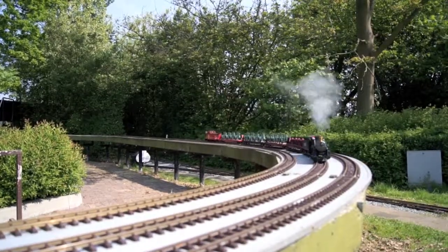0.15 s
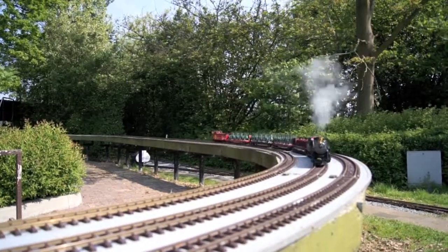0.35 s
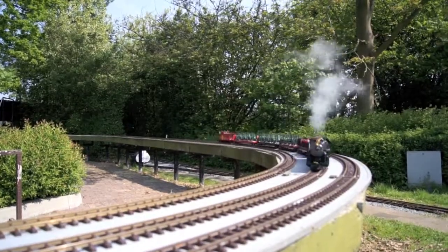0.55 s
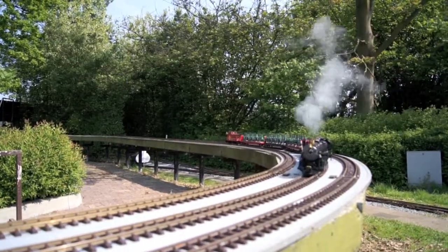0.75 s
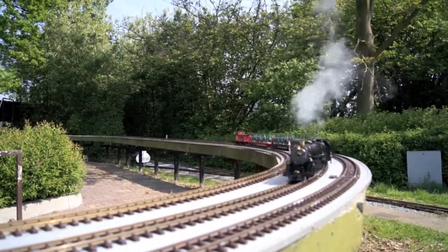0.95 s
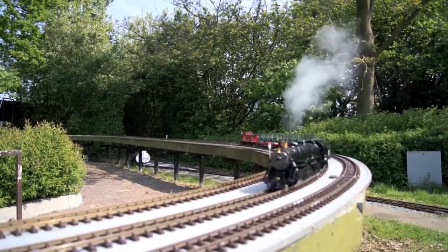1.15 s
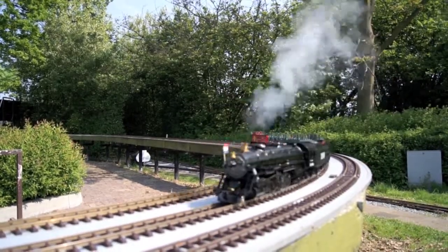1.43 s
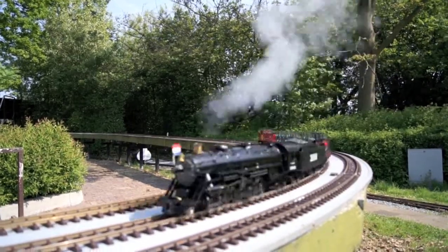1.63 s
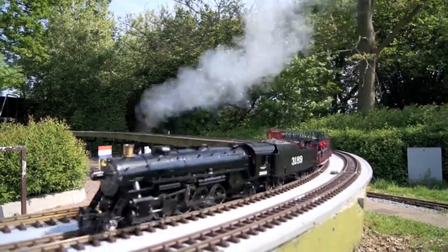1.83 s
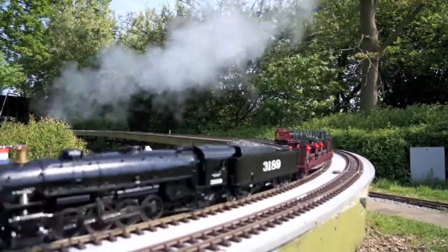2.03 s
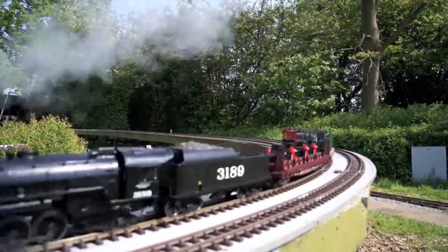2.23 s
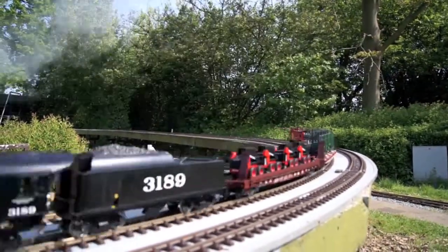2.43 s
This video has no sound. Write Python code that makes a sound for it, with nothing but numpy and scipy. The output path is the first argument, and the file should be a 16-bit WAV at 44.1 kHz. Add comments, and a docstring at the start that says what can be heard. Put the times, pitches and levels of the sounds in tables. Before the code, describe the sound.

A miniature steam locomotive chuffs rapidly and hisses as it passes from right to left.

```python
"""A small live-steam locomotive rounds a garden railway curve, passing close from right to left.
Its exhaust beats four times per wheel turn, unevenly: each puff roars in the chimney, rings in the
blast pipe and hisses, spitting a little water. The track bed reflects the steam and the hedges throw back
a soft wash. Heard from the trackside on a closely spaced microphone pair, over faint garden air."""
import sys
import numpy as np
from scipy import signal
from scipy.fft import rfft, irfft
from scipy.io import wavfile

SR = 44100
rng = np.random.default_rng(int(sys.argv[2]) if len(sys.argv) > 2 else 0)


def persist_wave(psi):
    """Save psi, clipped to +-1, as 16-bit WAV."""
    counts = np.round(np.clip(psi, -1, 1) * 32767).astype(np.int16)
    wavfile.write(sys.argv[1], SR, np.atleast_2d(counts).T)


N = 114660
TIME = np.arange(N) / SR
FRAME, HOP = 1024, 512

# engine's bearing from the microphones: t/s, bearing (-1 right, 0 ahead, 1 and beyond left)
BEARING = [(0, -.93), (.4, -.98), (.9, -.88), (1.4, -.62), (1.65, -.3), (1.85, .0), (2.05, .5), (2.2, .75),
           (2.35, 1.12), (2.6, 1.45)]


def from_db(db):
    """Decibels to gain."""
    return 10 ** (np.asarray(db) / 20)


def rms_one(x):
    """Scale to unit power."""
    return x / np.sqrt(np.mean(x ** 2) + 1e-20)


def in_time(rows, s, column=1):
    """One column of a curve at the given times."""
    rows = np.array(rows)
    return np.interp(s, rows[:, 0], rows[:, column])


def at_hz(rows, hz, column=1):
    """One column of a spectrum, joined on a log-frequency axis."""
    rows = np.array(rows)
    return np.interp(np.log(hz + 1), np.log(rows[:, 0]), rows[:, column])


def drift(rate_hz):
    """Random wander with a spread of 1, mostly slower than rate_hz."""
    hz = np.arange(N // 2 + 1) * SR / N
    return rms_one(irfft(rfft(rng.standard_normal(N)) / (1 + (hz / rate_hz) ** 2), N))


def band(spectrum, level_db, hz):
    """Gain of one group of resonances over frequency and time."""
    gain = from_db(at_hz(spectrum, hz)) * (hz >= spectrum[0][0]) * (hz < spectrum[-1][0])
    return rms_one(gain) * from_db(level_db)


def exhaust_flow(attack_s=.003, jitter_s=.0002, spread_db=.2):
    """Each beat of steam opens fast, holds and dies away; they overlap except at the end of the turn."""
    # start of each turn of the driving wheels: t/s
    turns = [-.113, .031, .177, .323, .468, .612, .759, .905, 1.053, 1.202, 1.352, 1.504, 1.657, 1.809,
             1.958, 2.107, 2.257, 2.406, 2.556, 2.706]
    # beats of one turn: start/turns, level/dB, hold/s, release time constant/s
    beats = [(-.012, .3, .019, .017), (.25, .6, .017, .023), (.48, -.4, .017, .024),
             (.685, -.1, .018, .012)]
    power = np.zeros(N)
    for start, end in zip(turns, turns[1:]):
        for share, db, hold, release in beats:
            late, strong = rng.standard_normal(2)
            age = TIME - start - share * (end - start) - jitter_s * late
            shape = np.clip(age / attack_s, 0, 1) * np.exp(-np.maximum(age - hold, 0) / release)
            power += (from_db(db + spread_db * strong) * shape) ** 2
    return rms_one(np.sqrt(power))


def spitting(flow, decay_s=.002, sputter_per_s=60, sputter_db=-13.):
    """Power of brief bursts of wet steam: a few strong spits, and a sputter during the beats."""
    # drops of water spat from the chimney: t/s, relative level/dB
    spits = [(.032, 0.), (.406, -1.), (.482, 1.), (.693, 1.), (.800, -1.), (1.100, -1.), (1.248, -1.),
             (1.505, 0.), (1.549, -2.), (2.001, -2.), (2.008, -2.), (2.560, -1.)]
    sputters = rng.random(N) < sputter_per_s * flow ** 2 / SR
    kicks = sputters * from_db(sputter_db) ** 2 * rng.exponential(1, N)
    for s, db in spits:
        kicks[int(s * SR)] += from_db(db) ** 2
    return signal.lfilter([2], [1, -np.exp(-1 / (decay_s * SR))], kicks)


def turbulence(beats, leak_db, flutter_db, flutter_hz, wash_s=.025):
    """Short-time spectra of the jet (beats over a steady leak) and its lagging wash on either side."""
    jet = rms_one(np.sqrt(beats + from_db(leak_db) ** 2) * from_db(flutter_db * drift(flutter_hz)))
    pole = np.exp(-1 / (wash_s * SR))
    lagged_power, _ = signal.lfilter([1 - pole], [1, -pole], jet ** 2, zi=[pole * jet[0] ** 2])
    wash = np.sqrt((jet ** 2 + lagged_power) / 2)
    noise = rng.standard_normal((3, N)) * [jet, wash, wash]
    return signal.stft(noise, SR, nperseg=FRAME, noverlap=FRAME - HOP)


def chimney(level_db, hz, s, ring_hz=845, half_width_hz=50, low_cut_hz=370):
    """Gain of the hollow chimney, whose main resonance stands out while the engine is closest."""
    # chimney resonances: f/Hz, level/dB
    resonances = [(200.0, -28.2), (330.0, -19.2), (420.0, -15.4), (490.0, -9.2), (590.0, -15.5),
                  (700.0, -7.3), (830.0, 0.0), (980.0, -4.9), (1200.0, -8.0), (1380.0, -18.5),
                  (1600.0, -11.5), (1800.0, -9.0), (2120.0, -7.3), (2350.0, -16.1)]
    # lift of the main resonance: t/s, level/dB
    lift = [(0, .5), (1.85, 0.), (2.1, 3.5), (2.35, 0.), (2.6, -1.)]
    ring = from_db(in_time(lift, s) / (1 + ((hz - ring_hz) / half_width_hz) ** 2))
    return band(resonances, level_db, hz) * ring * np.minimum(hz / low_cut_hz, 1) ** 2


def rumble(hz, s):
    """Gain of a low rumble that fades as the train comes round."""
    # rumble spectrum: f/Hz, level/dB
    spectrum = [(100, -22.), (150, -12.), (200, -5.), (300, 0.), (380, -8.)]
    # its fade: t/s, level/dB
    fade = [(0, -56.5), (1.3, -58.5), (2., -66.), (2.6, -70.)]
    return band(spectrum, in_time(fade, s), hz)


def blast_pipe(level_db, hz, s, shoulder_hz=3400, db_per_bearing=1.1):
    """Gain of the ringing blast pipe, which fills out below its main ring as the engine turns side-on."""
    # blast pipe resonances: f/Hz, level/dB
    resonances = [(2350, -32.), (2440, -22.), (2580, -10.8), (2870, -7.8), (3150, -10.6), (3460, -12.8),
                  (3620, -3.5), (3800, 0.), (4020, -6.5), (4220, -9.), (4350, -13.)]
    shoulder = from_db(db_per_bearing * in_time(BEARING, s) * (hz < shoulder_hz))
    return band(resonances, level_db, hz) * shoulder


def steam_hiss(lower_db, upper_db, sizzle_db, hz, s, top_from_hz=9500, top_full_hz=13000):
    """Gain of escaping steam: two bands of hiss and a sizzle whose top opens as the boiler goes by."""
    # the three bands, low to high: f/Hz, level/dB
    lower = [(4350, -3.), (4680, 0.), (5100, -4.6), (5400, -7.)]
    upper = [(5400.0, -6.2), (5850.0, -2.6), (6200.0, 0.0), (6500.0, -5.7), (6830.0, -15.0),
             (7050.0, -14.2), (7400.0, -17.8), (7800.0, -23.9)]
    sizzle = [(7800.0, -19.6), (8500.0, -8.7), (9100.0, 0.0), (10000.0, -6.3), (10800.0, -12.6),
              (12000.0, -21.3), (13200.0, -29.5), (15000.0, -37.4)]
    # lift of the sizzle's top: t/s, level/dB
    lift = [(0, -2.), (.5, -2.), (1.5, 1.5), (1.95, -1.), (2.2, 2.), (2.28, 15.), (2.6, 12.)]
    top = from_db(in_time(lift, s) * np.clip((hz - top_from_hz) / (top_full_hz - top_from_hz), 0, 1))
    return band(lower, lower_db, hz) + band(upper, upper_db, hz) + top * band(sizzle, sizzle_db, hz)


def track_bounce(hz, s, far_gain=.14):
    """Two reflections comb the steam with ridges that slide down as the engine nears."""
    # reflections: t/s, delay off the track bed/ms, delay of a longer path/ms, gain off the bed
    paths = [(0, .118, .8, .22), (.5, .15, .83, .2), (.9, .185, .86, .13), (1.25, .244, .888, .15),
             (1.6, .267, .92, .24), (1.9, .29, .955, .22), (2.2, .347, 1.0, .2), (2.4, .385, 1.03, .24),
             (2.6, .42, 1.06, .15)]
    bed, far = [np.exp(-2j * np.pi * hz * in_time(paths, s, column=k) / 1000) for k in (1, 2)]
    bed_gain = in_time(paths, s, column=3)
    return (1 + bed_gain * bed + far_gain * far) / np.sqrt(1 + bed_gain ** 2 + far_gain ** 2)


def microphones(frames, hz, s, near_wash_db=-2.5):
    """Trackside pair: bearing sets the balance and the jet's lag; each side gets its own wash."""
    # left minus right: f/Hz, level/dB for a source on the right, level/dB for one on the left
    balance = [(300.0, -0.1, -0.8), (520.0, -2.4, -1.1), (850.0, 1.5, 2.0), (1300.0, -1.1, 1.9),
               (1650.0, 6.8, 4.6), (2200.0, -0.4, 1.9), (2850.0, 3.8, 4.3), (3400.0, 0.4, 3.3),
               (3850.0, -6.0, 6.4), (4250.0, -0.0, 3.0), (4800.0, -13.1, -0.5), (5300.0, -13.9, 0.0),
               (6000.0, -16.4, -3.0), (6500.0, -8.3, 3.2), (6900.0, -3.4, -2.2), (7400.0, -3.7, 2.9),
               (8300.0, -0.8, 6.5), (9300.0, -0.8, 12.3), (10500.0, 3.6, 21.7), (12500.0, 3.6, 30.9)]
    # between the microphones: f/Hz, lag at bearing 1/ms, left phase lead from straight ahead/rad
    phasing = [(400, .05, .15), (1400, .085, .4), (1700, .05, .7), (2000, .09, .05), (2900, .115, -.1),
               (3700, .104, -.2), (4900, .1, -.1), (5400, .06, 2.2), (6200, .05, 2.8), (7000, .06, 2.9),
               (7900, .065, 3.05), (9100, .09, 3.5), (10500, .078, 3.5)]
    # sound that arrives scattered: f/Hz, share of the power with the engine at far right
    scatter = [(800, .05), (1300, .17), (1700, .42), (2700, .15), (4000, .14), (4900, .13), (5400, .42),
               (6200, .3), (7000, .35), (7900, .12), (9200, .25), (12000, .7)]
    bearing = in_time(BEARING, s)
    passed = np.clip((bearing + 1) / 2, 0, 1.1)
    ratio = from_db((1 - passed) * at_hz(balance, hz) + passed * at_hz(balance, hz, column=2))
    pan = np.array([ratio, np.ones_like(ratio)]) * np.sqrt(2 / (1 + ratio ** 2))
    lead_rad = 2 * np.pi * hz * bearing * at_hz(phasing, hz) / 1000 + at_hz(phasing, hz, column=2)
    half_lead = np.exp(.5j * lead_rad)
    direct = frames[0] * np.array([half_lead, half_lead.conj()])
    # the wash gives way to the direct jet as the engine comes alongside
    wash_share = np.clip(at_hz(scatter, hz) * from_db(near_wash_db * passed) ** 2, .01, .95)
    heard = direct * np.sqrt(1 - wash_share) + frames[1:] * np.sqrt(wash_share)
    return signal.istft(pan * heard, SR, nperseg=FRAME, noverlap=FRAME - HOP)[1][:, :N]


def locomotive(rough_db=.7, rough_hz=130, blast_trim_db=.4, hiss_trim_db=.6):
    """The same uneven beats drive the chimney's roar gently and the blast, hiss and sizzle strongly."""
    # steam on the way past: t/s, then relative level/dB of roar, blast, lower hiss, upper hiss, sizzle
    levels = [(0.0, -31.0, -19.1, -27.7, -25.7, -30.3), (0.25, -30.0, -18.5, -22.5, -24.8, -27.8),
              (0.65, -32.0, -19.0, -26.8, -27.9, -30.6), (1.0, -31.6, -18.3, -25.6, -26.5, -30.9),
              (1.35, -32.0, -18.5, -26.6, -25.3, -29.7), (1.65, -30.2, -17.5, -28.9, -23.4, -28.7),
              (1.92, -29.9, -18.4, -29.2, -24.8, -26.8), (2.02, -29.6, -19.2, -27.7, -26.4, -24.5),
              (2.2, -29.1, -18.2, -25.6, -27.1, -24.5), (2.28, -29.8, -18.7, -27.5, -30.5, -27.1),
              (2.45, -30.7, -17.7, -27.6, -29.6, -28.2), (2.6, -31.9, -17.7, -29.1, -31.8, -32.2)]
    flow = exhaust_flow() * from_db(rough_db * drift(rough_hz))
    beats = flow ** 2 + spitting(flow)
    hz, s, roar = turbulence(beats, leak_db=3., flutter_db=.4, flutter_hz=40)
    _, _, blast = turbulence(beats, leak_db=-12.5, flutter_db=.3, flutter_hz=120)
    _, _, hiss = turbulence(beats, leak_db=-12., flutter_db=.7, flutter_hz=120)
    hz = hz[:, None]
    roar_db, blast_db, lower_db, upper_db, sizzle_db = [in_time(levels, s, k) for k in range(1, 6)]
    roar *= chimney(roar_db, hz, s) + 1j * rumble(hz, s)  # a quarter cycle apart, so their powers add
    blast *= from_db(blast_trim_db) * blast_pipe(blast_db, hz, s)
    hiss *= from_db(hiss_trim_db) * steam_hiss(lower_db, upper_db, sizzle_db, hz, s)
    return microphones(roar + (blast + hiss) * track_bounce(hz, s), hz, s)


def garden_air(level_db=-77., wander_db=4.):
    """A faint, wavering low rumble, nearly alike at both microphones."""
    # garden air: f/Hz, level/dB
    spectrum = [(20, 0.), (55, -2.), (100, -12.), (250, -18.)]
    hz = np.arange(N // 2 + 1) * SR / N
    outside = np.maximum(spectrum[0][0] / (hz + 1), hz / spectrum[-1][0])
    gain = from_db(at_hz(spectrum, hz)) / np.maximum(outside, 1) ** 24  # steep beyond both ends
    mid, side = irfft(rfft(rng.standard_normal((2, N))) * gain, N)
    stereo = rms_one(mid + from_db(-16) * side * [[1], [-1]])
    return from_db(level_db + wander_db * drift(rate_hz=6)) * stereo


def scene():
    """The engine passes through the quiet garden."""
    return locomotive() + garden_air()


def record(dry):
    """Peaks are rounded and the top is cut steeply."""
    ceiling, cutoff_hz = 1.3, 15100
    low_pass = signal.ellip(10, .05, 60, cutoff_hz, fs=SR, output="sos")
    return signal.sosfiltfilt(low_pass, ceiling * np.tanh(dry / ceiling))


dry = scene()
out = record(dry)
persist_wave(out)
```